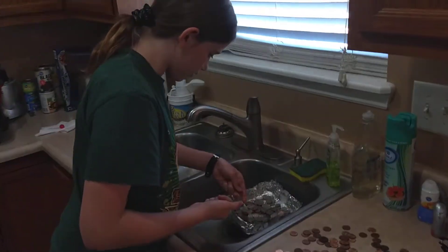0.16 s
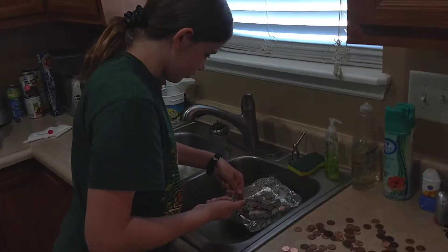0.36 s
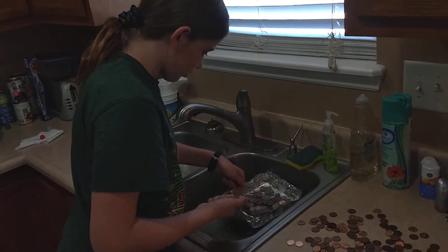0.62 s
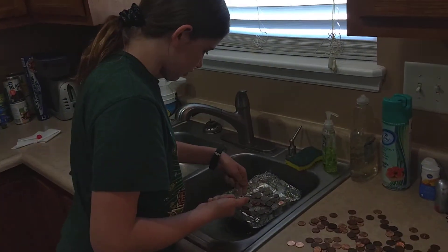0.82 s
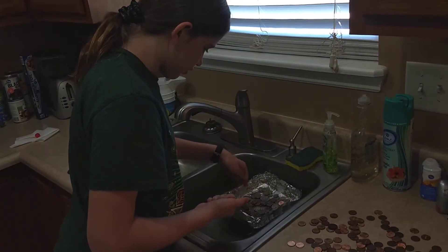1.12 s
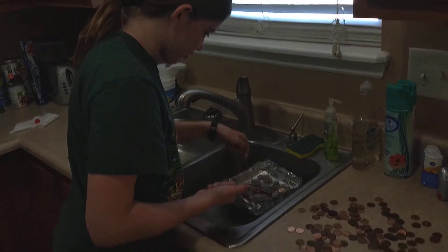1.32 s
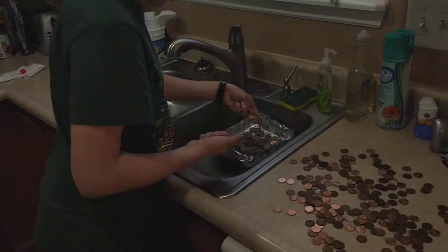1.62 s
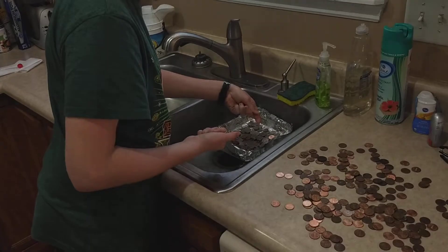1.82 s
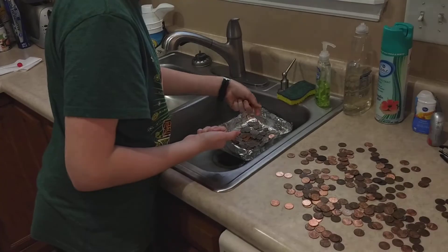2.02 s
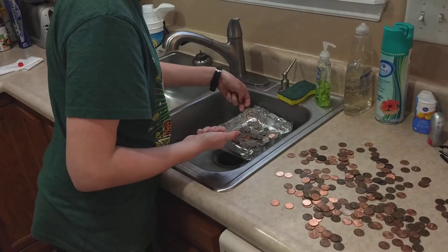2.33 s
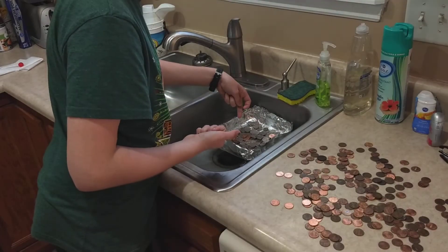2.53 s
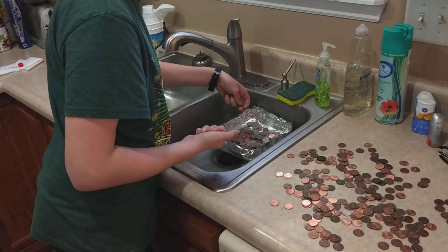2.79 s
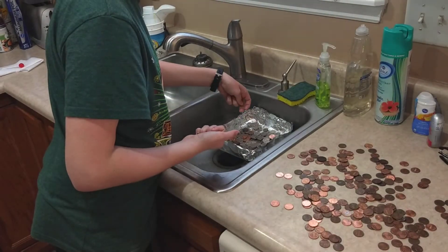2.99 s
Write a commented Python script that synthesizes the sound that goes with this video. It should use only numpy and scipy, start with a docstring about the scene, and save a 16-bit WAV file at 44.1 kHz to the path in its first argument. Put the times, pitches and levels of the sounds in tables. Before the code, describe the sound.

Single coins drop onto a coin pile in crackling foil, with sharp clinks and an appliance hum

```python
"""Coins into a foil boat

Coins drop one by one onto a pile of coins in a foil boat in a kitchen sink. Each clinks and rings:
noisy contact bursts, shimmering sines and grainy jingles. The foil crackles, rustles and knocks dully
in noise bursts and grains; an appliance hums in steady and drifting tones over a rush of air.
The recorder's gain control ducks at loud clinks, then lets the hum swell back."""
import sys
import numpy as np
from scipy import signal
from scipy.fft import rfft, irfft
from scipy.io import wavfile
from scipy.ndimage import uniform_filter1d

SR = 44100
rng = np.random.default_rng(int(sys.argv[2]) if len(sys.argv) > 2 else 0)


def unload_audio(sound):
    """Save the sound as a 16-bit wav file, at the path given as the first command line argument."""
    columns = np.transpose(np.atleast_2d(sound))
    # keep every value between -1 and 1, then stretch to whole-number steps
    steps = np.round(np.clip(columns, -1, 1) * 32767)
    wavfile.write(sys.argv[1], SR, steps.astype(np.int16))


N = 138915
TIME = np.arange(N) / SR


def from_db(db):
    """Decibels to gain."""
    return 10 ** (np.asarray(db) / 20)


def at_hz(points, hz):
    """Read a table on a log-frequency axis."""
    f, v = np.transpose(points)
    return np.interp(np.log(hz + 1e-6), np.log(f), v)


def bins(size):
    """Frequencies of a spectrum in Hz."""
    return np.arange(size // 2 + 1) * SR / size


def colour(x, spectrum):
    """Give noise a spectrum; rms 1."""
    y = irfft(rfft(x) * from_db(at_hz(spectrum, bins(len(x)))), len(x))
    return y / np.sqrt(np.mean(y ** 2))


def pan(db):
    """Left and right gains of equal total power; positive dB lifts left and lowers right."""
    g = from_db([[db], [-db]])
    return g / np.sqrt(np.mean(g ** 2))


def add(out, s, sound):
    """Mix a sound in at a time in seconds."""
    i = int(s * SR)
    out[i:i + len(sound)] += sound[:N - i]


def high_pass(x, cut_hz):
    """Take the bass off a body too small to radiate it."""
    return signal.sosfilt(signal.butter(2, cut_hz, "high", fs=SR, output="sos"), x)


def burst(spectrum, decay_s):
    """A short contact: a fading noise burst with a set spectrum and the energy of a plain decay."""
    t = TIME[:2048]
    fade = np.exp(-t / decay_s)
    # keep only the phases of fading noise; the magnitudes come from the table
    phase = np.angle(rfft(rng.standard_normal(len(t)) * fade))
    x = irfft(from_db(at_hz(spectrum, bins(len(t)))) * np.exp(1j * phase))
    x = x * fade ** (1 / 4)  # gentle extra fade
    return x * np.sqrt(np.sum(fade ** 2) / np.sum(x ** 2))


def blows(rows, spectrum, decay_s):
    """A table of short contacts on one body."""
    out = np.zeros(N)
    for s, db in rows:
        add(out, s, from_db(db) * burst(spectrum, decay_s))
    return out


def grains(per_s, spectrum):
    """Random tiny touches at a mean rate, coloured by the body they strike; rms 1."""
    touches = rng.standard_normal(N) * (rng.random(N) < per_s / SR)
    return colour(touches, spectrum)


SHIMMER_HZ = 257  # random jitter points per second


def shimmering(hz, t, depth):
    """A sine of rms 1 whose height and phase jitter."""
    points = rng.standard_normal(size=(2, 2000))
    re, im = (np.interp(t * SHIMMER_HZ, np.arange(len(z)), z) for z in points)
    depth = np.clip(depth, 0, 1)
    jitter = np.sqrt(1 - depth ** 2) + depth * (re + 1j * im) / np.sqrt(2)
    carrier = np.exp(2j * np.pi * (hz * t + rng.random()))
    return np.sqrt(2) * np.real(jitter * carrier)


def mode(hz, t60, depth):
    """A dying, shimmering sine that starts at rms 1."""
    t = TIME[:SR // 2]
    return shimmering(hz, t, depth) * from_db(-60 * t / t60)


COIN_PAN_DB, ROOM_PAN_DB = -23, -3
ROOM_T60_S, ROOM_ONSET_S = .25, 0.00059


def kitchen(x, room_db):
    """Direct sound from the right plus the diffuse ring of sink and room."""
    t = TIME[:SR // 2]
    envelope = from_db(-60 * t / ROOM_T60_S) * (1 - np.exp(-t / ROOM_ONSET_S))
    tail = rng.standard_normal((2, len(t))) * envelope
    tail /= np.sqrt(np.sum(tail ** 2, axis=1, keepdims=True))
    ring = signal.fftconvolve(x[None], tail)[:, :N]
    return pan(COIN_PAN_DB) * x + from_db(room_db) * pan(ROOM_PAN_DB) * ring


# fan and room air: (f/Hz, level/dB per Hz)
AIR = [(20, -102), (35, -121), (58, -75.5), (95, -82.5), (130, -68.5), (195, -66), (230, -58.5),
       (280, -63.5), (440, -64), (520, -70.5), (700, -70.5), (1100, -76), (1650, -77.5), (2400, -81.5),
       (3000, -89), (4200, -90), (8500, -100), (12500, -99), (16000, -96)]
# how alike the air is in both channels: (f/Hz, left-right correlation)
LIKENESS = [(50, -0.5), (130, 0.39), (230, 0.8), (550, 0.69), (1200, -0.26), (2500, 0.063), (8000, -0.13)]


def air():
    """Steady broadband rush, its two channels partly alike at each frequency."""
    hz = bins(N)
    alike = np.clip(at_hz(LIKENESS, hz), -1, 1)
    noise = rfft(rng.standard_normal((2, N)))
    mid, side = noise * from_db(at_hz(AIR, hz)) * np.sqrt(SR) / 2
    return irfft(np.sqrt(1 + alike) * mid + np.sqrt(1 - alike) * side * [[1], [-1]], N)


WAVER_HZ = 3.8  # low-pass corner of the drift


def waver():
    """Slow complex chance; rms 1."""
    step = 100  # samples between drift points
    low_pass = signal.butter(2, WAVER_HZ, fs=SR / step, output="sos")
    z = signal.sosfilt(low_pass, rng.standard_normal((2, N // step + 502)))[:, 500:]  # skip the start-up
    z = (z[0] + 1j * z[1]) / np.sqrt(2 * np.mean(z ** 2))
    return np.interp(np.arange(N) / step, np.arange(len(z)), z)


# appliance tones: (f/Hz, level/dB, waver/0-1)
HUM = [(118.6, -54, .2), (225.9, -43, 0), (240.2, -46, 0), (272.2, -53.5, 1), (362.4, -50.5, 0),
       (561.3, -53.5, 0.9), (1160, -64, 0.86)]


def hum():
    """Motor tones, some steady and some slowly drifting in height and phase."""
    out = np.zeros(N)
    for f, db, depth in HUM:
        drift = 1 - depth + np.sqrt(abs(depth)) * waver()
        out += from_db(db) * np.sqrt(2) * np.real(drift * np.exp(2j * np.pi * f * TIME))
    return out


AIR_PAN_DB = -1.05


def appliance():
    """Motor tones, some steady and some slowly drifting, over a steady rush of air."""
    return pan(AIR_PAN_DB) * (air() + hum())


# coins and fingers slide over foil: (t/s, level/dB, attack/s, decay/s)
RUSTLES = [(.51, -49.5, 0.057, 0.12), (1.473, -39, 0.029, 0.095), (1.61, -45, 0.02, 0.23),
           (2.94, -48.5, 0.012, 0.048)]
# colour of rubbed foil: (f/Hz, level/dB)
RUSTLE = [(500, -15), (1500, 4), (2400, 4.5), (3000, 3), (4500, -7), (7000, -17.5), (11000, -15),
          (16000, -7)]
RUSTLE_GRAINS_PER_S = 2100


def rustles():
    """Sliding over foil: dense grains that swell and fade."""
    rubbing = np.zeros(N)
    for s, db, attack, decay in RUSTLES:
        slope = np.maximum((s - TIME) / attack, (TIME - s) / decay)
        rubbing += from_db(db) * np.exp(-slope)
    return grains(RUSTLE_GRAINS_PER_S, RUSTLE) * rubbing


# the foil wall buckles: (t/s, level/dB)
BUCKLES = [(.507, -29), (.522, -53), (1.468, -28.5), (1.477, -36), (1.49, -29.5), (1.924, -41),
           (1.933, -42)]
# colour of a buckle: (f/Hz, level/dB)
BUCKLE = [(600, 2), (1600, -5), (2500, -2.5), (3050, 1), (3700, -11), (5000, -11), (12000, -26)]


def buckles():
    """The foil wall buckles: longer, mid-heavy bursts."""
    return blows(BUCKLES, BUCKLE, decay_s=0.0058)


# the foil snaps: (t/s, level/dB)
SNAPS = [(.0508, -32), (.0735, -30), (.0897, -46), (.1136, -36), (.1695, -33), (.2877, -35.5), (.507, -34),
         (.521, -28), (.578, -36), (.660, -43), (.709, -39.5), (1.1596, -26), (1.4486, -39),
         (1.6028, -18.5), (1.6065, -19.5), (1.612, -31), (1.618, -21), (1.627, -36), (1.635, -30),
         (1.650, -28), (1.6765, -25), (1.687, -37), (1.695, -39), (1.748, -28), (1.792, -34), (1.9172, -36),
         (1.9225, -30), (1.931, -47), (2.029, -23), (2.036, -28), (2.373, -38.5), (2.911, -23),
         (2.921, -23), (2.948, -30), (2.962, -32), (2.975, -30), (3.076, -34.5)]
# colour of a snap: (f/Hz, level/dB)
SNAP = [(500, -1.5), (2000, -19.5), (4000, -6), (5500, 3.5), (8000, -1.5), (10000, 0.5), (13000, 2),
        (16000, 0.5)]


def snaps():
    """The foil snaps: short, bright bursts."""
    return blows(SNAPS, SNAP, decay_s=0.0015)


# the hull takes a coin's weight: (t/s, level/dB)
KNOCKS = [(1.160, -26), (1.191, -27), (1.9455, -27), (1.953, -14), (1.957, -16.5), (2.642, -15),
          (2.644, -20)]
# colour of the hull: (f/Hz, level/dB)
KNOCK = [(40, -40), (150, -12), (380, 13), (600, 8), (900, 4), (1400, 2.5), (2200, 0), (3500, -7.5),
         (6000, -23), (12000, -70)]


def knocks():
    """The hull thuds as it takes the weight: dull bursts."""
    return blows(KNOCKS, KNOCK, decay_s=0.0026)


FOIL_ROOM_DB, KNOCK_ROOM_DB = 0.5, -17  # room ring re direct sound before panning
LOW_CUT_HZ = 76  # the small hull radiates no deep bass


def foil():
    """Sharp snaps, buckling walls, grainy rustles and the dull knock of the hull."""
    crackle = snaps() + buckles() + rustles()
    sound = kitchen(crackle, FOIL_ROOM_DB) + kitchen(knocks(), KNOCK_ROOM_DB)
    return high_pass(sound, LOW_CUT_HZ)


# the two close modes of the last coin: f/Hz
FREE_HZ = [12419, 12881]
# the last coin rings on while it rolls: (t/s, lower mode level/dB, upper mode level/dB)
FREE_RING = [(2.924, -38, -26), (2.955, -33, -30), (2.985, -33, -24), (3.008, -23.5, -26),
             (3.035, -32, -23.5), (3.05, -40, -45), (3.065, -37, -55), (3.095, -56, -67), (3.15, -51, -62)]
ROLL_SHIMMER = 0.32  # depth 0-1 of the jitter while a coin rolls on its rim


def rolling_coin():
    """A coin on its rim sings roughly in two close modes, then sinks to a faint ring."""
    s, *levels = np.transpose(FREE_RING)
    ring = np.zeros(N)
    for hz, db in zip(FREE_HZ, levels):
        ring += from_db(np.interp(TIME, s, db)) * shimmering(hz, TIME, ROLL_SHIMMER)
    return pan(COIN_PAN_DB) * ring * (TIME > s[0])


# a landing coin sets the pile jingling: (t/s, level/dB, decay/s)
JINGLES = [(1.162, -20, 0.024), (1.605, -43, .03), (1.659, -45, .022), (1.95, -34, 0.0098),
           (2.641, -23, .02), (2.681, -32, .015), (2.925, -33, 0.065)]
# colour of the jingling pile: (f/Hz, level/dB)
JINGLE = [(3000, -27), (7000, -9), (10000, -11), (12000, 6), (13000, 1), (14400, 0), (15800, 4)]
JINGLE_TOUCHES_PER_S = 600


def jingle():
    """Dense tiny touches run through the pile after a landing and die away."""
    stir = np.zeros(N)
    for s, db, decay in JINGLES:
        stir += from_db(db) * (TIME > s) * np.exp(-np.abs(TIME - s) / decay)
    return grains(JINGLE_TOUCHES_PER_S, JINGLE) * stir


# colour of coin striking coin: (f/Hz, level/dB)
CONTACT = [(300, -24), (2000, -17.5), (4300, -24), (6800, -1.5), (9000, -11), (11000, -1), (13000, 6),
           (15000, -0.5), (17000, 7.5)]
RATTLE_PER_S, RATTLE_DECAY_S = 900, 0.0073


def rattle():
    """Nudged coins chatter: a quickly fading run of tiny collisions."""
    t = TIME[:SR // 5]
    clicks = rng.standard_normal(len(t)) * (rng.random(len(t)) < RATTLE_PER_S / SR)
    return colour(clicks, CONTACT) * np.exp(-t / RATTLE_DECAY_S)


# neighbouring coins ring along: f/Hz
PILE_HZ = [11800, 12000, 12430, 13650, 14330, 14780, 15020, 15720]
PILE_T60_S, PILE_SHIMMER = 0.1, .7


def pile_ring():
    """The neighbours' modes, set off together by a contact."""
    return sum(mode(hz, PILE_T60_S, PILE_SHIMMER) for hz in PILE_HZ) / 2


# coin meets coin: (t/s, contact level/dB, first mode f/Hz, second mode f/Hz,
# ring level/dB re contact, ring t60/s)
CLINKS = [(.554, -22, 12740, 12600, -13, 0.095), (0.569, -38, 12600, 12570, 1, 0.19),
          (.621, -34.5, 12170, 12800, -8.5, 0.19), (.635, -30.5, 12200, 13000, -8, 0.13),
          (0.649, -27, 12695, 14500, -21, 0.11), (0.702, -29, 12100, 13200, -19, 0.061),
          (1.1597, 0.5, 11980, 14700, -14, 0.042), (1.185, -9.5, 13470, 14560, -15, 0.054),
          (1.197, -14, 12150, 15050, -14, 0.036), (1.245, -25, 13300, 13800, -3, 0.054),
          (1.27, -17, 11800, 13400, -17, 0.026), (1.604, -25, 13600, 16200, -16, .05),
          (1.620, -26, 12500, 15500, -16, 0.057), (1.659, -15.5, 13400, 14200, -13, .04),
          (1.9446, -10.5, 12700, 12800, -5, 0.048), (1.9526, -2, 13500, 12700, -6, .04),
          (1.9524, 0, 14400, 14570, -16, 0.03), (2.030, -19.5, 12400, 12990, -12, 0.051),
          (2.247, -18, 12000, 13300, -14, 0.023), (2.6417, 1.5, 13400, 14100, -20, 0.06),
          (2.6548, -12.5, 13900, 14850, -9, 0.076), (2.68, -18, 14100, 14800, -1, 0.054),
          (2.918, -13, 12340, 14740, -1, 0.1), (2.9229, -11, 12420, 13000, 0.5, 0.027),
          (2.95, -17, 13600, 14500, -11, 0.072), (2.973, -16.5, 14300, 15700, -13, 0.045),
          (3.035, -27, 12880, 14040, 2, 0.033)]
CONTACT_DECAY_S = .0009
RATTLE_DB, PILE_DB = -21, -34  # gains re contact
SHIMMER = 0.8  # a ringing coin jitters against its neighbours: depth 0-1
COIN_LOW_CUT_HZ = 600  # coins are too small to radiate bass
COIN_ROOM_DB = -4  # room ring re direct sound before panning


def coins():
    """Each contact is a crack, the coin's own two modes, a faint pile ring and a rattle, over jingles."""
    out = jingle()
    for s, db, first_hz, second_hz, ring_db, t60 in CLINKS:
        own = (mode(first_hz, t60, SHIMMER) + mode(second_hz, t60, SHIMMER)) / np.sqrt(2)
        add(out, s, from_db(db) * burst(CONTACT, CONTACT_DECAY_S))
        add(out, s, from_db(db + ring_db) * own)
        add(out, s, from_db(db + PILE_DB) * pile_ring())
        add(out, s, from_db(db + RATTLE_DB) * rattle())
    # the tiny offset keeps silence from slowing the filter
    return kitchen(high_pass(out + 1e-18, COIN_LOW_CUT_HZ), COIN_ROOM_DB)


def scene():
    """Everything as it reaches the two microphones."""
    return appliance() + foil() + rolling_coin() + coins()


LIMIT_DB, START_DUCK_DB, RECOVER_DB_PER_S = -24.5, 11, 8.5
ATTACK_S, LOOK_AHEAD_S = 0.0036, .0013


def gain_control(x):
    """Peaks over the limit push the gain down within milliseconds; it climbs back at a steady rate."""
    power = uniform_filter1d(np.mean(x ** 2, axis=0), size=132)  # over 3 ms
    level_db = 10 * np.log10(np.abs(power) + 1e-12)
    climb = RECOVER_DB_PER_S * TIME
    # adding the climb turns steady recovery into a running maximum
    pushed = np.maximum(level_db - LIMIT_DB + climb, START_DUCK_DB)
    duck = np.maximum(np.maximum.accumulate(pushed) - climb, 0)
    duck = np.interp(TIME + LOOK_AHEAD_S, TIME, duck)
    r = np.exp(-1 / (ATTACK_S * SR))
    smooth = duck[0] + signal.lfilter([1 - r], [1, -r], duck - duck[0])
    return x * from_db(-smooth)


# stereo widening: (f/Hz, share of the other channel/0-1)
CROSSFEED = [(200, 0.027), (1000, 0.99), (4000, 0.8), (9000, 0.62), (15000, 0.58)]
CROSSFEED_LAG_S = .000454


def widen(x):
    """Each channel gets a late, inverted share of the other."""
    hz, spectrum = bins(N), rfft(x)
    share = np.clip(at_hz(CROSSFEED, hz), 0, 1)
    late = np.exp(-2j * np.pi * hz * CROSSFEED_LAG_S) * spectrum[::-1]
    return irfft((spectrum - share * late) / np.sqrt(1 + share ** 2), N)


HISS_DB, CUTOFF_HZ = -77, 15850


def record(dry):
    """Gain control, stereo widening, faint hiss and a steep top cut."""
    hiss = from_db(HISS_DB) * rng.standard_normal((2, N))
    top_cut = signal.ellip(10, .2, 80, CUTOFF_HZ, fs=SR, output="sos")
    return signal.sosfilt(top_cut, widen(gain_control(dry)) + hiss)


dry = scene()
out = record(dry)
unload_audio(out)
```